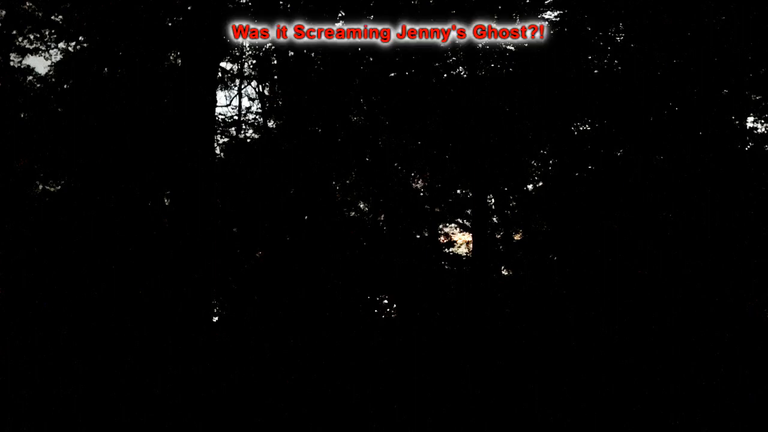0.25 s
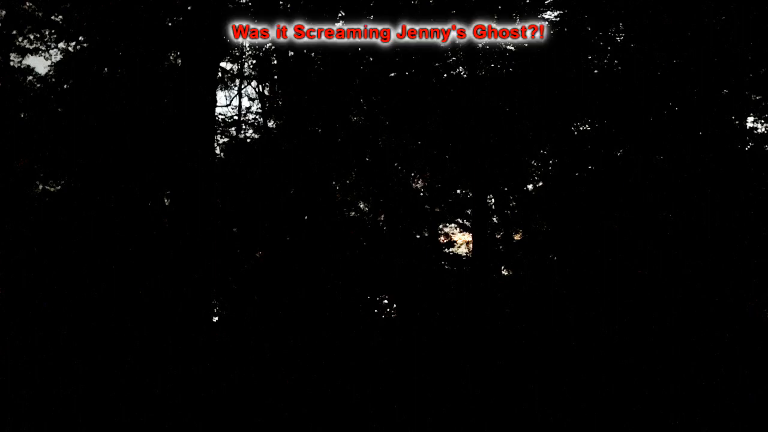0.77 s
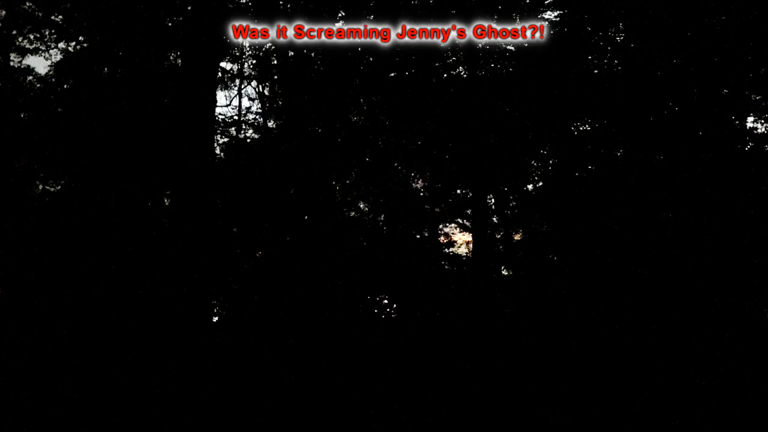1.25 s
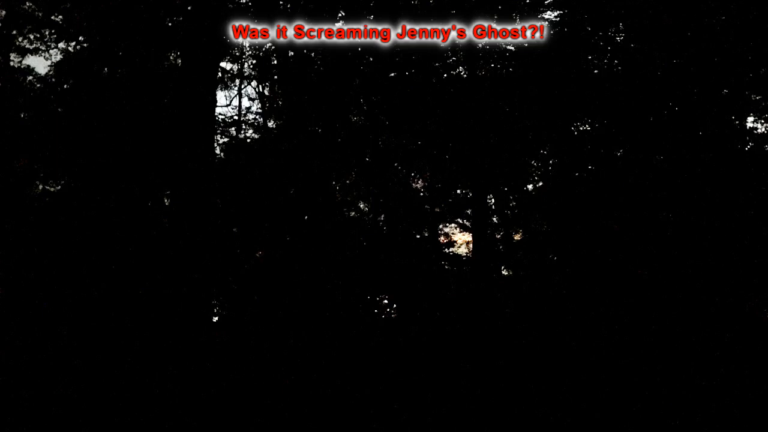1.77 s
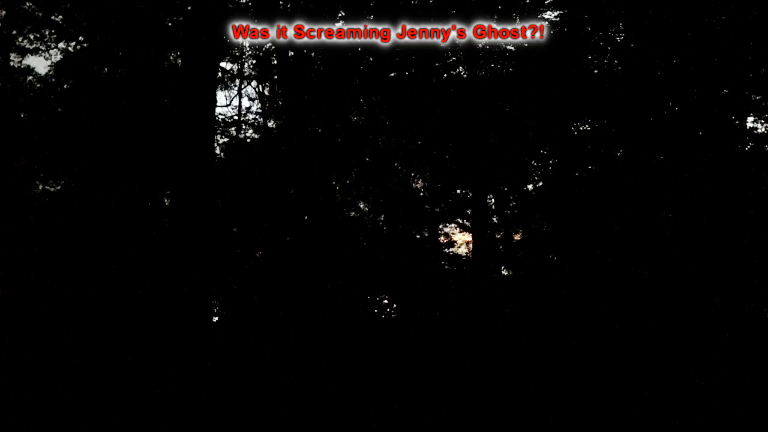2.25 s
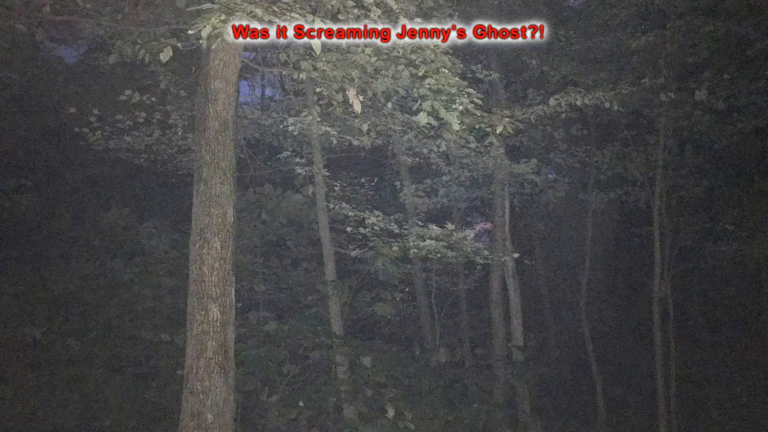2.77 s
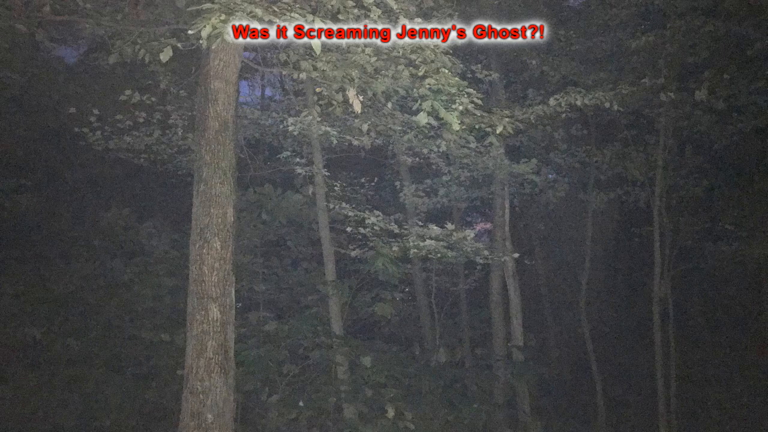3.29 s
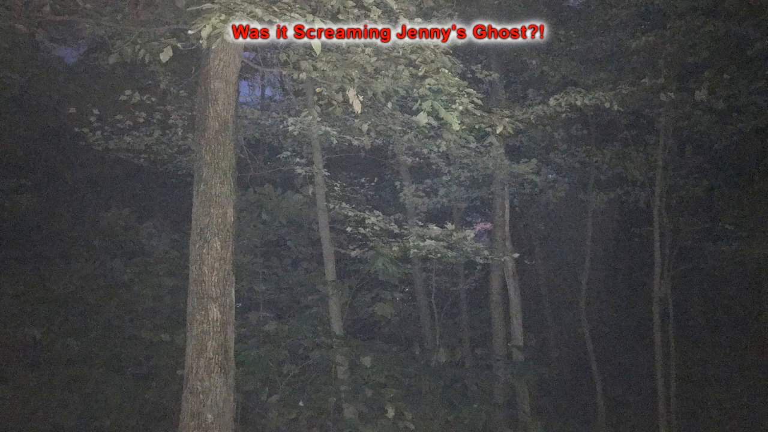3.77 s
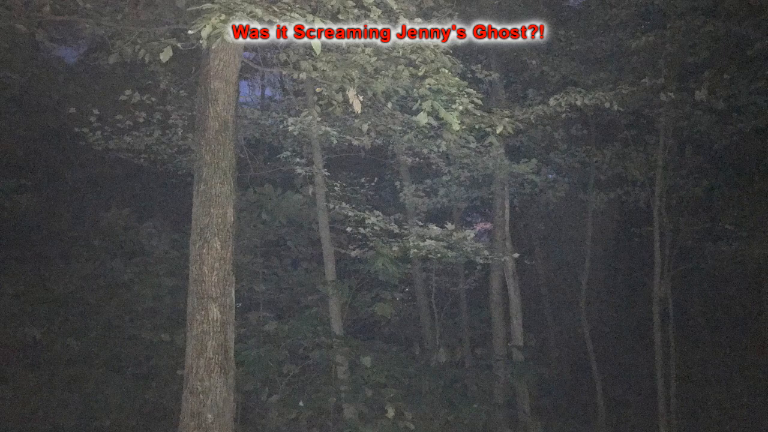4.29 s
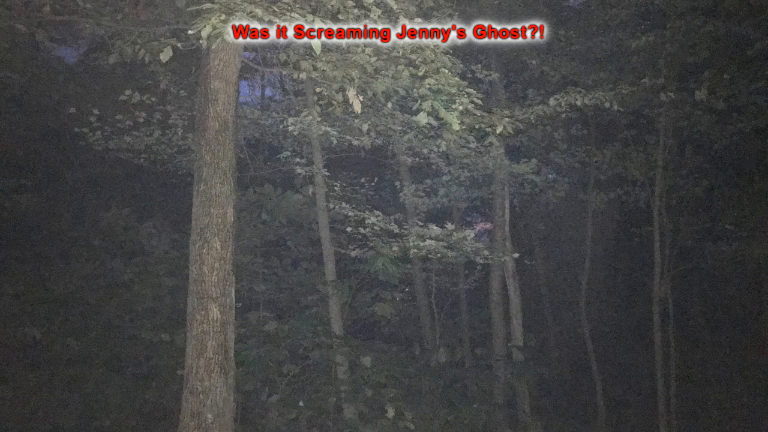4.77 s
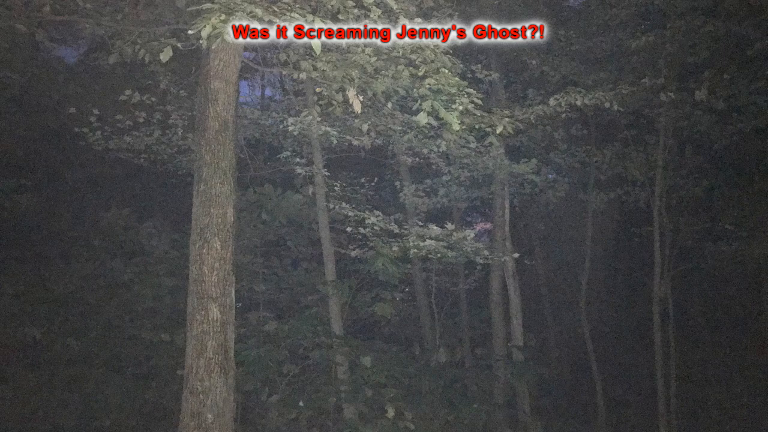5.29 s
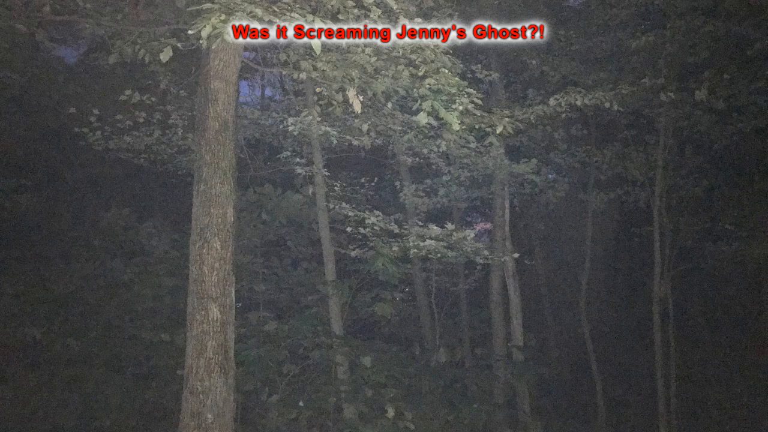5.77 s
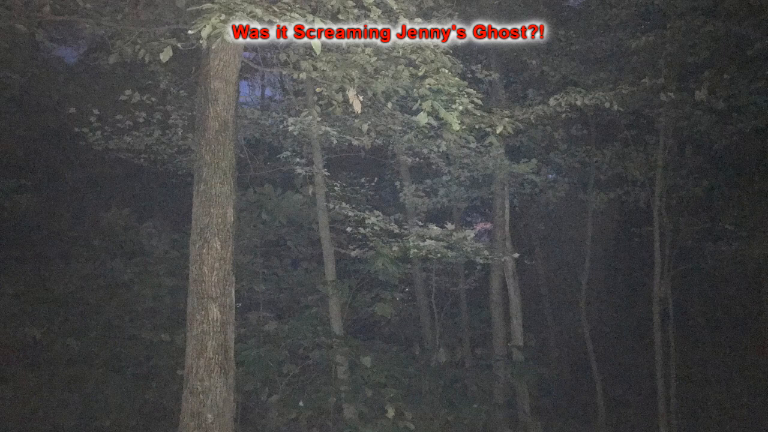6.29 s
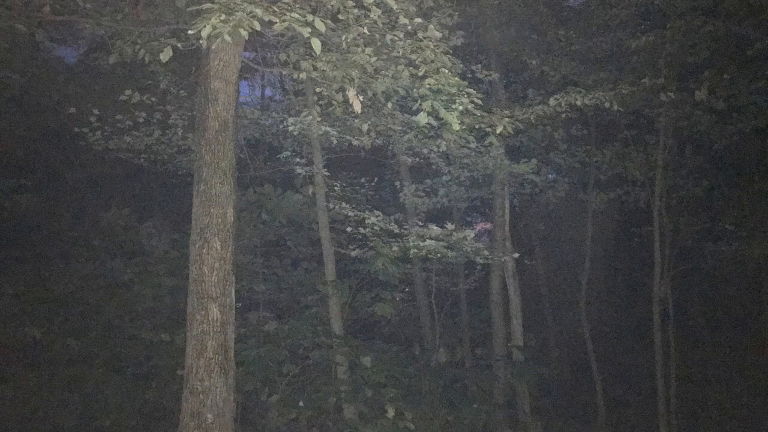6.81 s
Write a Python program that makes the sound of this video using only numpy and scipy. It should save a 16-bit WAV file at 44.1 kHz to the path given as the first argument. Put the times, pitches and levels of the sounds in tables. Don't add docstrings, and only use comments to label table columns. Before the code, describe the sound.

A small owl gives quavering, whistled whinnies in a night forest over steady cricket trilling and katydid rasps, with one sharp twig snap.

```python
import sys
import numpy as np
from scipy import signal
from scipy.fft import rfft, irfft, next_fast_len
from scipy.io import wavfile
from scipy.ndimage import uniform_filter1d

SR = 44100
rng = np.random.default_rng(int(sys.argv[2]) if len(sys.argv) > 2 else 0)


def volts(x):
    e = np.asarray(x, float) / 20
    return 10 ** e


def store_wav(level_fs):
    pcm = np.round(np.clip(np.atleast_2d(level_fs), -1, 1) * 32767)
    wavfile.write(sys.argv[1], SR, pcm.T.astype(np.int16))


N = 310905
T = np.arange(N) / SR


def level(x, db=0):
    return x * volts(db) / np.sqrt(np.mean(x ** 2))


def curve(table, off_db=-90):
    s, *columns = np.transpose(table)
    inner = [np.interp(T, s, c) for c in columns[:-1]]
    return inner + [np.interp(T, s, columns[-1], off_db, off_db)]


def bouts(table, fade_s):
    return sum(db * (np.tanh((T - a) / fade_s) - np.tanh((T - b) / fade_s)) / 2 for a, b, db in table)


def shape(x, gain):
    size = next_fast_len(N)
    hz = np.arange(size // 2 + 1) * SR / size + 1e-3
    return irfft(rfft(x, size) * gain(hz), size)[:N]


def coloured(x, points):
    hz, db = np.transpose(points)
    return level(shape(x, lambda f: volts(np.interp(np.log(f), np.log(hz), db, -120, -120))))


def resonance(x, hz, width_hz):
    return level(shape(x, lambda f: 1 / (1 + ((f - hz) / (width_hz / 2)) ** 2)))


def walk(rate):
    k = int(SR / rate)
    held = np.repeat(rng.standard_normal(N // k + 1), k)
    return 1.224 * uniform_filter1d(uniform_filter1d(held, k), k)[:N]


def forest(x, wet_db, steady=False):
    t60_s, build_s = 1.63, 0.036
    t = T[:2 * SR]
    tail = rng.standard_normal(len(t)) * volts(-60 * t / t60_s) * np.clip(t / build_s, 0, 1)
    wet = signal.fftconvolve(x, tail / np.sqrt(np.sum(tail ** 2)))
    already_ringing = steady * np.pad(wet[N:], (0, 2 * N - len(wet)))
    return x + volts(wet_db) * (wet[:N] + already_ringing)


def traffic():
    # frequency in Hz, strength in dB per Hz.
    rumble = [(11, -43), (18, -12), (54, -0.5), (68, 2.5), (78, -5.5), (91, -7), (114, -10.5), (168, -21),
              (204, -21), (351, -30), (400, -41), (520, -67), (880, -120)]
    # start in seconds, end in seconds, gain in dB.
    passes = [(-.2, .04, 4.5), (.15, .25, 1.5), (.38, .47, 3), (.7, 1.1, 1.5), (2.45, 2.8, 3.5),
              (2.95, 3.16, 4.5), (3.22, 3.54, 5.5), (3.66, 4.02, 2.5), (4.2, 4.6, -2.5), (5.4, 6.1, 1),
              (6.35, 6.48, 2), (6.92, 7.3, 3)]
    return coloured(rng.standard_normal(N), rumble) * volts(-30.5 + bouts(passes, 0.035))


def air():
    # frequency in Hz, strength in dB per Hz.
    hiss = [(150, 0.5), (300, -3.5), (700, -7), (1000, -9), (1600, -14.5), (2600, -12.5), (4850, -18),
            (5600, -16.5), (6200, -21.5), (9000, -25), (14000, -20.5), (16000, -25)]
    return coloured(rng.standard_normal(N), hiss) * volts(-42.5 + 0.29 * walk(2.86))


def trill(hz, rate, share, scatter, sag=.02):
    strokes = np.cumsum(rate) / SR + rng.random()
    chance = rng.standard_normal((1000, 2))[strokes.astype(int)]
    stroke = np.minimum(strokes % 1 / share, 1)
    pitch = hz * (1 + scatter * chance[:, 0] + sag * (.5 - stroke))
    tone = np.sin(2 * np.pi * np.cumsum(pitch) / SR)
    return level(np.sin(np.pi * stroke) * volts(2.3 * chance[:, 1]) * tone)


def chorus(count=5):
    # pitch in Hz, pitch spread in Hz, pulses a second, sounding share of a pulse 0-1, level in dB.
    crowds = [(2067, 110, 40, .4, -52.5), (3170, 90, 62, .32, -45), (3436, 95, 58, .32, -28.5),
              (3746, 120, 66, .3, -37), (4132, 130, 52, .26, -42.5), (4490, 140, 56, .26, -53)]
    out = 0
    for hz, spread_hz, rate, share, db in crowds:
        who = rng.standard_normal((count, 2))
        pace = 1 + .03 * walk(4)
        pitches = hz + spread_hz * np.linspace(-1, 1, count)
        crowd = 0
        for pitch, (hurry, nearness) in zip(pitches, who):
            crowd = crowd + volts(1.56 * nearness) * trill(pitch, rate * (1 + .12 * hurry) * pace, share, .02)
        out = out + level(crowd, db)
    loudness = np.sqrt(np.mean(out ** 2))
    return level(forest(out, 3.3, steady=True)) * loudness * volts(0.42 * walk(1.2))


def soloist(cricket, share, wet_db, scatter, sag):
    (hz, rate, db), song = cricket
    loud = volts(db + bouts(song, 0.11) + 1.1 * walk(11))
    song_tone = trill(hz, rate * (1 + 0.0093 * walk(5)), share, scatter, sag)
    return forest(song_tone * loud, wet_db, steady=True)


def single_crickets():
    # pitch in Hz, pulses a second, resting level in dB; then rows of start and end in seconds, gain in dB.
    tree_cricket = (2007, 38, -60), [(-.3, 3.07, 8.5), (4.4, 4.7, 8)]
    high_cricket = (15100, 47.9, -69), [(-.3, 2.7, 9), (6.2, 7.3, 6)]
    near_cricket = (4130, 44.6, -70.5), [(-.3, 3, 28.5)]
    next_cricket = (4143, 47.8, -71.5), [(2.95, 7.3, 22.7), (6.2, 11, 2.4)]
    solos = soloist(tree_cricket, .65, 0.85, 0.011, .025) + soloist(high_cricket, .1, -6, .01, .06)
    return solos + sum(soloist(c, .28, -2.5, .012, 0.046) for c in (near_cricket, next_cricket))


def scrape(grain_db):
    return rng.standard_normal(N) * volts(grain_db * walk(300))


def far_katydids():
    # middle in seconds, length in seconds, wing resonance in Hz, level in dB.
    rasps = [(.05, 0.25, 2330, -49), (0.252, 0.16, 2460, -47.5), (0.717, .12, 2290, -59),
             (1.45, .15, 2266, -59), (2.352, 0.13, 2357, -48), (2.588, .15, 2360, -46),
             (3.357, 0.1, 2160, -51), (3.628, 0.18, 2180, -48.5), (4.461, .13, 2860, -45),
             (4.47, 0.15, 2010, -47), (4.717, 0.22, 2840, -46), (4.721, 0.21, 2150, -50),
             (5.024, 0.21, 2830, -44), (5.018, 0.3, 2060, -44), (5.327, .15, 2314, -52),
             (5.844, 0.16, 2205, -53), (6.412, 0.12, 2320, -50), (6.651, 0.17, 2300, -47),
             (6.72, .15, 2820, -52)]
    far = np.zeros(N)
    for s, length, hz, db in rasps:
        i = slice(max(int((s - .2) * SR), 0), int((s + 0.15) * SR))
        wing = signal.butter(2, [hz - 180, hz + 180], "band", fs=SR, output="sos")
        rasp = signal.sosfilt(wing, rng.standard_normal(20000))[:len(far[i])]
        far[i] += level(rasp, db) * np.exp(-((T[i] - s) / (length / 2)) ** 4)
    return forest(far, -12.0)


def meadow_katydids():
    # frequency in Hz, width in Hz, level in dB.
    wings = [(5265, 620, -1.5), (6940, 1000, -1), (8080, 1100, -1.5), (10110, 1400, -3),
             (12000, 2300, -8.5)]
    # start in seconds, end in seconds, gain in dB.
    joining = [
        (-.3, .8, 1.5),
        (1.95, 2.65, 2.5),
        (4.2, 4.8, 2.5),
        (5.65, 6.1, 1.5),
    ]
    haze = 0
    for hz, width_hz, db in wings:
        waver = volts(db + .8 * walk(6) + .7 * walk(1.5))
        haze = haze + waver * resonance(scrape(1.8), hz, width_hz)
    return level(haze) * volts(-48 + bouts(joining, 0.097))


def near_katydid():
    # frequency in Hz, strength in dB per Hz.
    wing = [(3240, -40), (5500, -15), (6080, -16), (6710, -4), (8160, 2), (12500, -4.5), (15500, -15)]
    # time in seconds, peak in dB.
    strokes = [
        (5.595, -40),
        (5.72, -39),
        (5.79, -40),
        (5.86, -38.5),
        (5.998, -40),
        (6.125, -40),
    ]
    rise_db_s, fall_db_s = 250, 77
    swells = [volts(db - np.maximum(rise_db_s * (s - T), fall_db_s * (T - s))) for s, db in strokes]
    return coloured(scrape(0.75), wing) * np.max(swells, axis=0)


def twig():
    # time in seconds, peak in dB.
    snaps = [
        (1.6887, 4),
        (1.6949, -8),
    ]
    # frequency in Hz, level in dB, time to fall 60 dB in seconds.
    wood = [
        [(800, -24, .008), (1400, -16, .015), (2200, -4, .005), (2800, 0, .005), (3350, -2, .012),
         (4100, -10, .006), (6500, -8, .003), (7500, -6, .003), (8400, -3, .004), (10000, -10, .003),
         (12600, -19, .003), (15000, -27, .003)],
        [(4100, 0, .005), (6700, -4, .004), (7800, -3, .004), (11000, -16, .003), (14500, -20, .003)],
    ]
    t, out = T[:2000], np.zeros(N)
    for (s, db), modes in zip(snaps, wood):
        ring = 0
        for k, (hz, mode_db, t60) in enumerate(modes):
            ring = ring + (-1) ** k * volts(mode_db - 60 * t / t60) * np.sin(2 * np.pi * hz * t)
        splinter = volts(-30 - 60 * t / .045) * np.diff(rng.standard_normal(len(t) + 1))
        crack = ring * np.clip(t / .0003, 0, 1) + splinter
        i = int(s * SR)
        out[i:i + len(t)] += volts(db) * crack / np.max(np.abs(crack))
    return forest(out, -20)


def whistle(hz, db, overtone_db=-40):
    phase = 2 * np.pi * np.cumsum(hz * (1 + 0.00308 * walk(30))) / SR
    throat = volts(overtone_db) / (1 + ((2 * hz - 2090) / 160) ** 2)
    tone = np.sin(phase) + throat * np.sin(2 * phase)
    return uniform_filter1d(volts(db), size=200) * np.sqrt(2) * tone


def owl():
    # time in seconds, middle pitch in Hz, quaver depth in Hz, breath level in dB.
    calls = [
        [(.015, 1016, 3, -40.5), (.16, 1207, 2, -26), (.2, 1248, 8, -32), (.5, 1217, 10, -29.5),
         (.64, 1173, 4, -21.5), (.74, 1158, 22, -22.5), (.84, 1130, 68, -25.5), (.92, 1004, 15.5, -33.5),
         (1.175, 1006, 14, -31)],
        [(3.22, 1050, -2, -46), (3.33, 1182, -2, -32.5), (3.395, 1289, 1, -32.5), (3.7, 1265, 0, -31.5),
         (3.76, 1217, 15, -28.5), (3.88, 1199, 27, -25), (3.95, 1126, 17, -27.5), (4.13, 1043, 12, -25),
         (4.425, 995, 12, -30)],
        [(6.645, 1060, 0, -45), (6.674, 1075, 0, -41.5), (6.74, 1146, 0, -33), (6.785, 1197, 0, -30),
         (6.825, 1282, 0, -37), (6.87, 1238, 0, -37), (6.905, 1260, 0.0015, -33), (6.935, 1483, 0, -42),
         (7.12, 1400, 0, -49)],
    ]
    # time in seconds, pitch in Hz, level in dB.
    breaks = [
        [(6.91, 1253, -42), (6.94, 1175, -33), (6.99, 1200, -50), (7.05, 1190, -37)],
        [(6.92, 1304, -39), (6.96, 1330, -38), (7.01, 1294, -42), (7.05, 1284, -33)],
    ]
    # time in seconds, depth in dB.
    catch_rows = [(.175, -7.5), (.29, -7), (.336, -5), (0.543, -8.5), (.7, -5), (.845, -12), (.912, -6),
                  (.985, -7), (1.07, -10), (1.135, -6.5), (3.362, -9), (3.528, -11), (3.582, -13),
                  (3.66, -4), (3.727, -11), (3.935, -0.5), (4.03, -6), (4.115, -0.5), (4.26, -8),
                  (4.333, -14), (6.805, -10)]
    crests = [.797, 3.893, 6.8]
    overtones = [-23, -21, -30]
    quaver_hz, catch_s = 12.7, .012
    scoop_s, scoop_hz, scoop_db = .028, 70, -14
    hook_s, hook_hz, hook_db = .032, 220, -14

    voice = sum(whistle(*curve(b)) for b in breaks)
    catches = sum(db * np.exp(-((T - s) / catch_s) ** 2) for s, db in catch_rows)
    for call, crest_s, overtone_db in zip(calls, crests, overtones):
        hz, depth_hz, breath_db = curve(call)
        scoop = np.clip(1 - (T - call[0][0]) / scoop_s, 0, 1)
        hook = np.clip(1 - (call[-1][0] - T) / hook_s, 0, 1)
        quaver = depth_hz * np.cos(2 * np.pi * quaver_hz * (T - crest_s))
        pitch = hz + quaver - scoop_hz * scoop - hook_hz * hook ** 1.54
        loud_db = breath_db + catches + scoop_db * scoop + hook_db * np.sqrt(hook)
        voice = voice + whistle(pitch, loud_db, overtone_db)
    return forest(voice, -8)


def scene():
    background = traffic() + air() + chorus() + single_crickets()
    katydids = far_katydids() + meadow_katydids() + near_katydid()
    return (background + katydids + twig() + owl())[None]


def band_limit(x):
    return signal.sosfilt(signal.butter(12, 16490, fs=SR, output="sos"), x)


def record(dry):
    top_hz = 15750
    dull = shape(dry[0], lambda f: 1 / (1 + (f / top_hz) ** 200))[None]
    return band_limit(np.clip(dull, -.97, .97))


dry = scene()
out = record(dry)
store_wav(out)
```